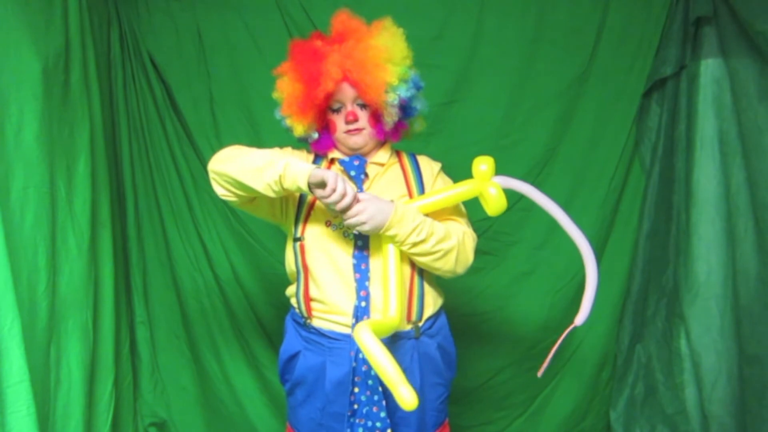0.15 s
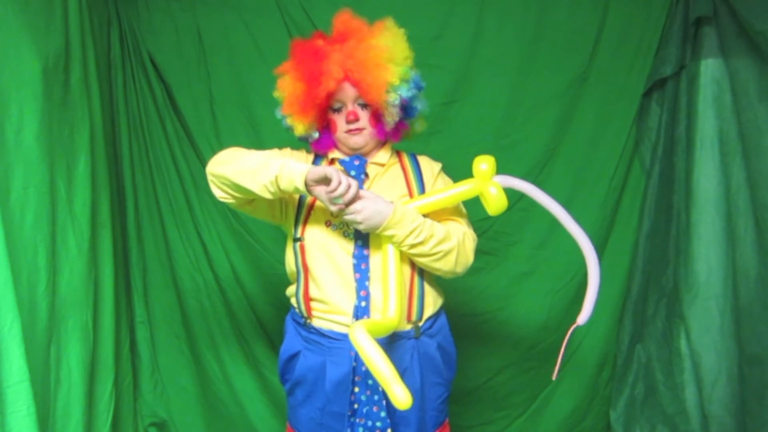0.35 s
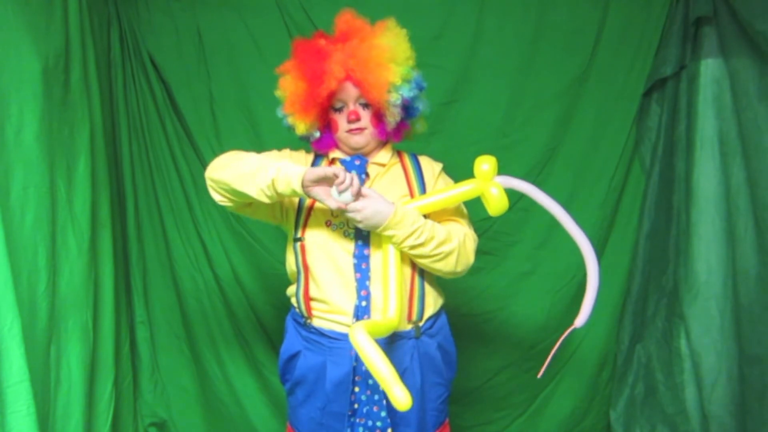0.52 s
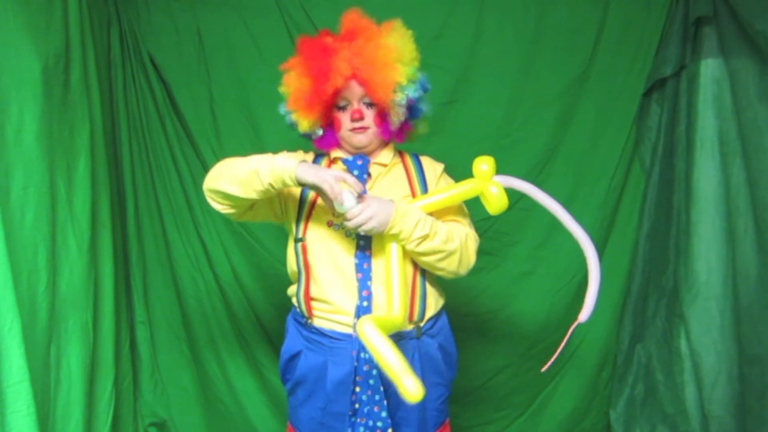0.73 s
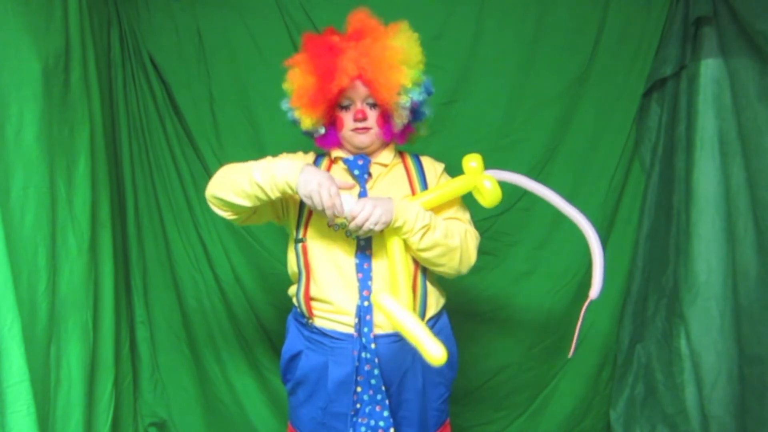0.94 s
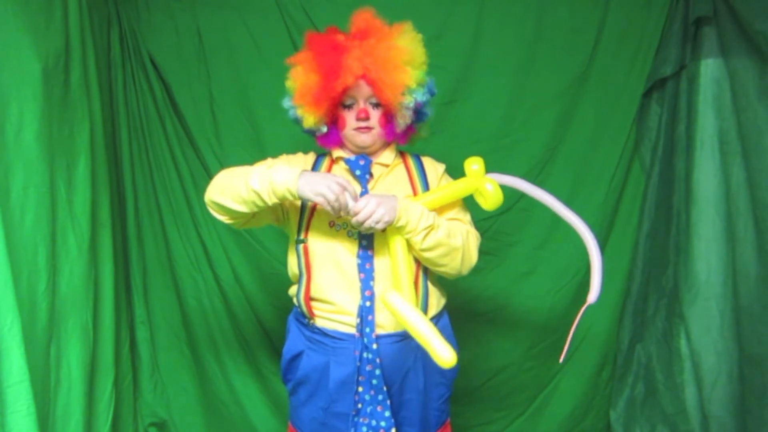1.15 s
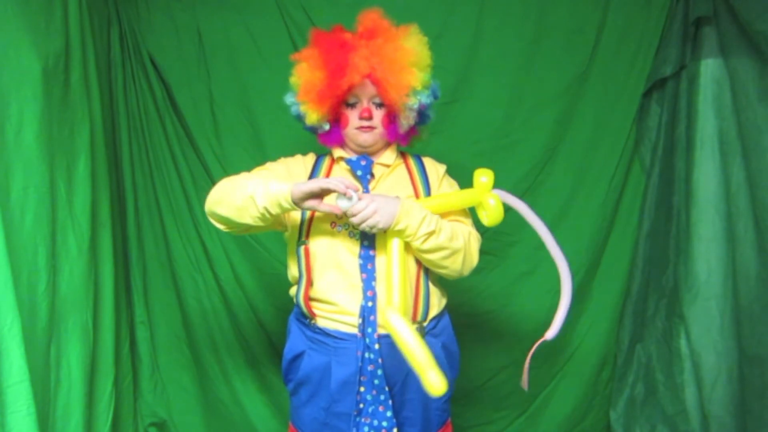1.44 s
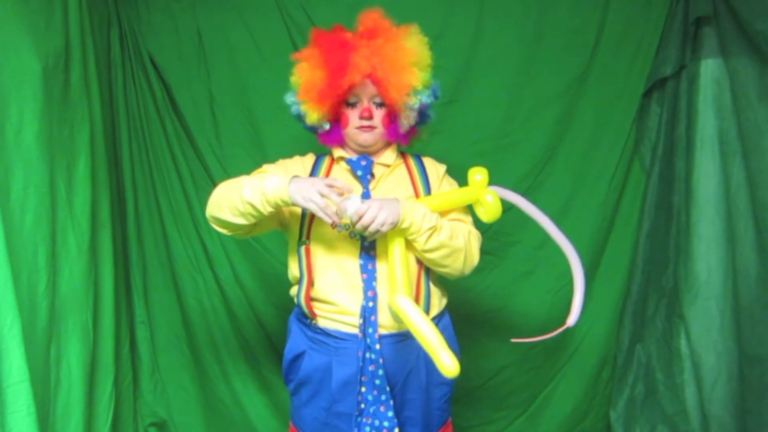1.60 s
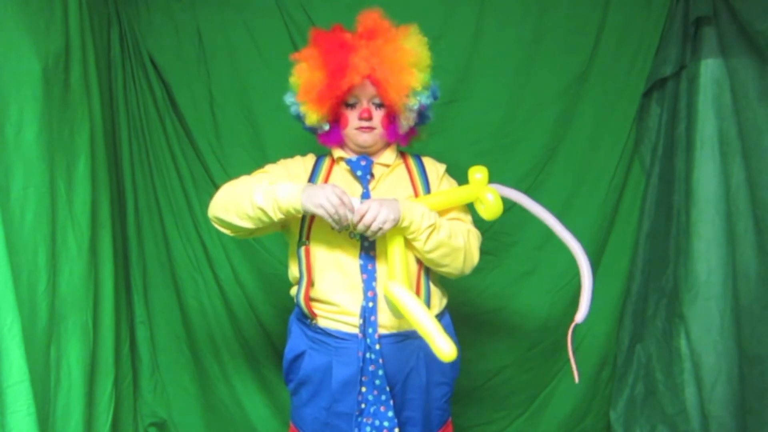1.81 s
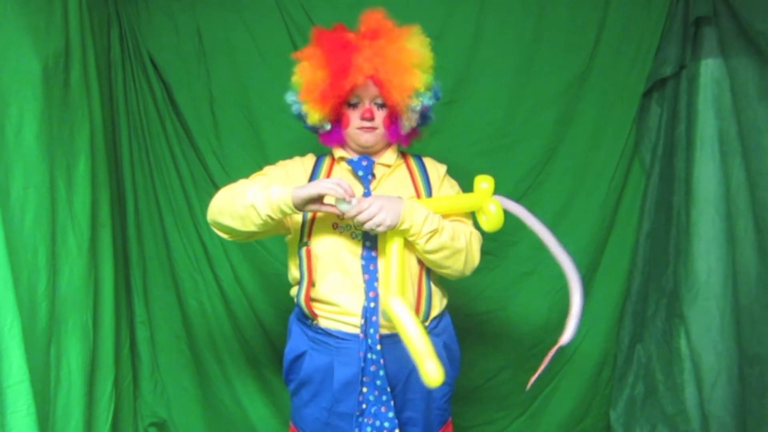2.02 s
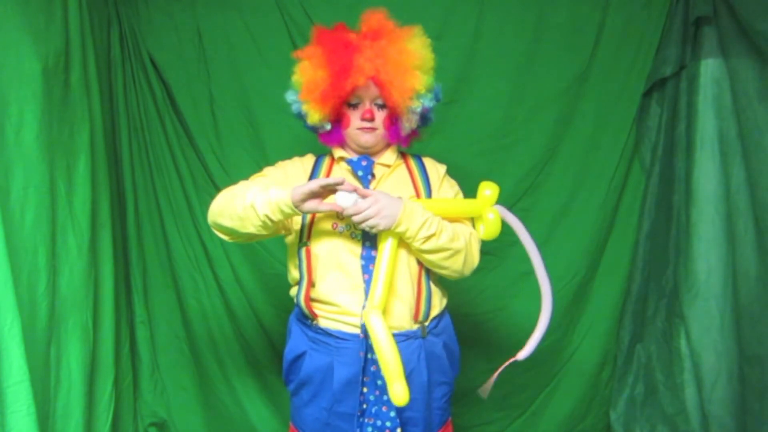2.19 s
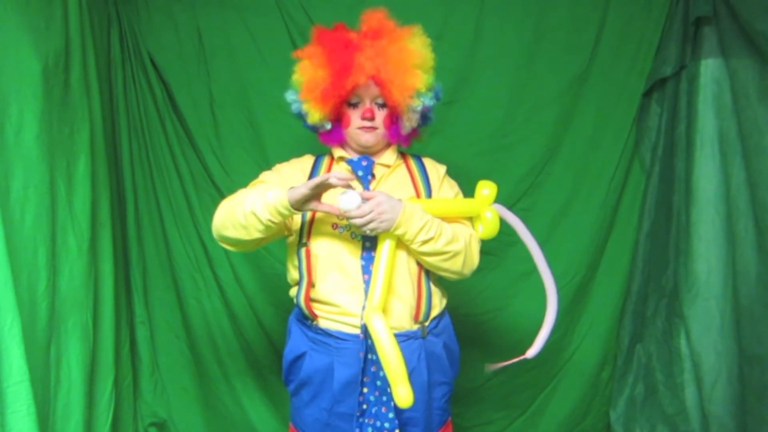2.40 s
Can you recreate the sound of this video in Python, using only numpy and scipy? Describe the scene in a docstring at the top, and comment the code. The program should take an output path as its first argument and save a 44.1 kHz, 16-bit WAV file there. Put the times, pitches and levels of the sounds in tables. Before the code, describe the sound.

Rubbery squeaks and rasps of a balloon being twisted in short bursts, over faint ventilation.

```python
"""Gloved hands squeeze and twist a thin latex balloon in a small room, over a ventilation hum.
First comes a quiet creak with a rough squeak: the rubber sticks and slips, ringing the tight skin,
the air inside and a low note of the room. Near 0.5 s it gets louder: sudden releases rasp, single hard
slips snap, and fast regular slips squeak. After a lull, the sharpest snaps come near 1.4 s. Around 2 s
a last burst of rasps leads to two low squeaks, and a faint creak dies away."""
import sys
import numpy as np
from scipy import signal
from scipy.fft import rfft, irfft
from scipy.io import wavfile
from scipy.ndimage import uniform_filter1d, map_coordinates

SR = 44100
rng = np.random.default_rng(int(sys.argv[2]) if len(sys.argv) > 2 else 0)


def transcribe(u):
    """Save the signal u as a 16-bit wav file named by the first command-line argument.

    u: samples, shape (n,) or (channels, n), limited to [-1, 1]; the rate is SR.
    q: integer samples, one column per channel.
    """
    v = np.clip(np.atleast_2d(u).T, -1, 1)
    q = np.round(v * 32767).astype(np.int16)
    wavfile.write(sys.argv[1], SR, q)


N = 112454


def amp(db):
    """Turns decibels into a number to multiply by."""
    return 10 ** (np.asarray(db) / 20)


def unit(x):
    """Scales a sound to an average (rms) level of 1."""
    return x / np.sqrt(np.mean(x ** 2) + 1e-20)


def look_up(points, hz):
    """Finds the value at a frequency between the rows of a table."""
    row_hz, value = np.transpose(points)
    return np.interp(np.log(hz + 1), np.log(row_hz), value)


def add(mix, start_s, sound):
    """Mixes a sound in at its start time."""
    part = mix[max(round(start_s * SR), 0):][:len(sound)]
    part += sound[:len(part)]


def colour(x, points, size=2048):
    """Makes some frequencies louder and others softer, with no ringing ahead of a click."""
    log_gain = np.log(amp(look_up(points, abs(np.fft.fftfreq(size, 1 / SR)))))
    taps = np.fft.ifft(np.exp(np.conj(signal.hilbert(log_gain)))).real
    return signal.fftconvolve(x, taps)[:len(x)]


def resonate(x, hz, width_hz):
    """Rings at a pitch that may move; a smaller width rings longer."""
    turn = np.exp(2j * np.pi * np.cumsum(hz * np.ones(len(x))) / SR)
    decay = np.exp(-np.pi * width_hz / SR)
    return 2 * (turn * signal.lfilter([1 - decay], [1, -decay], x / turn + 1e-18)).real


def drift(n, per_s):
    """Wanders around zero, reaching a new random value per_s times a second."""
    return np.interp(np.arange(n) * per_s / SR, np.arange(4096), rng.standard_normal(4096))


# The tone of the moving air. Each row: frequency in Hz, relative level in dB.
AIR_TONE = [(15, -74.5), (25, -24.5), (84, -18.5), (117, -10), (285, -12), (317, -12.5), (344, -14),
            (373, -4), (476, -8), (516, -11.5), (796, -9.5), (863, -22), (988, -12.5), (1700, -16.5),
            (3250, -31.5), (16000, -59)]
# How much the air noise differs between left and right. Each row: frequency in Hz, gain in dB.
AIR_WIDTH = [(30, -3), (120, -3), (350, -7), (1500, -11), (5000, -1), (12000, -3)]
# The notes of the hum. Each row: pitch in Hz, level in dB.
HUM_NOTES = [(317.6, -56.5), (473.7, -48), (1157, -57)]


def ventilation():
    """Air rushes steadily under a few wavering hum notes."""
    mid, side = (amp(-43.5) * unit(colour(rng.standard_normal(N + SR), AIR_TONE)[SR:]) for _ in range(2))
    for hz, db in HUM_NOTES:
        phase = 2 * np.pi * np.cumsum(hz + 3.56 * drift(N, 13.99)) / SR
        waver = 1 + .061 * drift(N, 25)
        mid = mid + amp(db) * np.sqrt(2) * np.sin(phase) * waver
    side = colour(side, AIR_WIDTH)
    return np.array([mid + side, mid - side])


# How long the room rings. Each row: frequency in Hz, seconds to fade by 60 dB.
ROOM_FADE = [(200, 0.13), (450, 0.19), (1200, 0.16), (3000, 0.18), (6000, 0.22), (12000, 0.061)]


def room_tail(rise_s=.0068):
    """Countless echoes blur into noise, each frequency dying at its own speed."""
    noise = rng.standard_normal(SR // 2)
    t = np.arange(len(noise)) / SR
    rise = np.minimum(t / rise_s, 1)
    shape = rise * np.exp(-t / .03) + .01
    for _ in range(3):  # even out the tone, then the loudness
        spectrum = rfft(noise * shape)
        noise = irfft(spectrum / (abs(spectrum) + 1e-9), len(noise)) / shape
        noise /= np.sqrt(uniform_filter1d(noise ** 2, size=400))
    hz, age_s, bands = signal.stft(noise, SR, nperseg=256)
    fade = 10 ** (-3 * age_s / look_up(ROOM_FADE, hz)[:, None])
    tail = signal.istft(bands * fade, SR, nperseg=256)[1][:len(t)] * rise ** 2
    return tail / np.linalg.norm(tail)


# Echoes from nearby surfaces. Each row: delay in seconds, strength as a share of the direct sound.
NEAR_ECHOES = [(.0032, 0.87), (.0047, 0.38), (.0069, 0.21), (0.0111, 0.18), (0.0136, 0.25)]
# How much the room's tail differs between left and right. Each row: frequency in Hz, gain in dB.
ROOM_WIDTH = [(200, -14.5), (1200, -15), (2500, -15.5), (5000, -9.5), (9000, 0)]
MOVES_PER_S = 7  # how often the hands move and stretch the balloon


def room(x):
    """Near echoes shift as the balloon moves; a short tail follows, wider in the treble."""
    mid, t = x.copy(), np.arange(N) / SR
    for delay_s, gain in NEAR_ECHOES:
        late_s = delay_s + .0003 * drift(N, MOVES_PER_S)
        mid += gain * map_coordinates(x, [(t - late_s) * SR], order=3)
    tail, wide = (amp(-2) * signal.fftconvolve(x, room_tail())[:N] for _ in range(2))
    side = colour(wide, ROOM_WIDTH)
    return np.array([mid + tail + side, mid + tail - side])


# A low ring of the room near 380 Hz, and the balloon's higher notes.
# Each row: pitch in Hz, width in Hz, gain in dB.
RINGING_NOTES = [(378, 26, -2), (972, 25, -3.5), (1105, 17, -0.5), (1547, 37, -1), (2195, 240, -6.5),
                 (2936, 183, -3.5)]


def ringing(rubbing):
    """Rubbing sets off a low ring of the room and the balloon's higher notes; all waver in pitch."""
    bend = 1 + .04 * drift(N, MOVES_PER_S)
    return rubbing + sum(amp(db) * resonate(rubbing, hz * bend, width) for hz, width, db in RINGING_NOTES)


def cut_lows(x, ring_hz):
    """A tight patch of skin gives off little sound below its own pitch."""
    cutoff_hz = np.clip(.41 * ring_hz, 50, 5000)
    return signal.sosfilt(signal.butter(2, cutoff_hz, "high", fs=SR, output="sos"), x)


def slips(per_s, jitter=.3, spread_db=2):
    """Rubber sticks and slips: clicks of uneven spacing and size, the first one at once."""
    gap, size = rng.standard_normal((2, 400))
    due = np.cumsum(np.exp(jitter * gap))
    at = np.searchsorted(np.cumsum(per_s) / SR, due - due[0])
    in_time = at < len(per_s)
    pulses = np.zeros(len(per_s))
    pulses[at[in_time]] = amp(spread_db * np.tanh(size[in_time]))
    return pulses / np.sqrt(per_s)  # faster slipping is no louder


# The tone of a slip's scratch. Each row: frequency in Hz, relative level in dB.
SCRATCH_TONE = [(60, -58), (220, 16), (420, -12.5), (1200, -4.5), (2400, 10), (3500, 5), (5800, -1),
                (8000, -9.5), (10000, -17), (11200, -31.5), (12200, -85), (13500, -27.5), (15800, -31.5)]


def scratch(pulses, grit_s=.0018, grit_db=-9.5):
    """Each slip has a sharp edge, trailed by a little grit."""
    trails = signal.lfilter([1], [1, -np.exp(-1 / (grit_s * SR))], pulses)
    grit = trails * rng.standard_normal(len(pulses))
    return unit(colour(pulses + amp(grit_db) * grit, SCRATCH_TONE))


# The tone of the ringing skin. Each row: frequency in Hz, relative level in dB.
SKIN_TONE = [(60, -62.5), (260, -12.5), (420, 1), (650, 8.5), (1100, 1.5), (1800, 2), (2400, 3.5),
             (3300, -6), (5000, -8.5), (9000, -18.5), (12000, -85)]


def creak(slips_per_s, ring_hz, scratch_db):
    """Slips ring the skin at a pitch set by its tightness: a dull knock and a longer singing note."""
    hz = np.mean(ring_hz)
    knock_width_hz, sing_width_hz = hz / .88, hz / 7.2
    pulses = slips(slips_per_s)
    knock = cut_lows(pulses, hz)
    for _ in range(2):
        knock = resonate(knock, ring_hz, knock_width_hz)
    sing = resonate(knock, ring_hz, sing_width_hz)
    skin = unit(colour(unit(knock) + amp(-21.5) * unit(sing), SKIN_TONE))
    return skin + amp(scratch_db) * cut_lows(scratch(pulses), hz)


# One list of moments for each twist. Each row: time in seconds, level in dB, skin pitch in Hz,
# slips per second, scratch in dB compared with the ring.
TWIST_CURVES = [
    [(0, -41.5, 1970, 298, -1.5), (.04, -40, 1944, 343, -8.5), (.066, -39.5, 2060, 259, -4.5),
     (.11, -36.5, 1806, 286, -5), (.14, -35.5, 1690, 189, -1.5), (.22, -38.5, 1550, 95, -1.5),
     (.285, -36.5, 1592, 208, -8), (.31, -51, 1540, 225, -7), (.365, -39.5, 1330, 210, -18)],
    [(.395, -42, 1197, 150, -10), (.44, -43, 1240, 212, -5.5), (.484, -30.5, 1260, 280, -14.5),
     (.507, -13, 1610, 347, -8), (.522, -32, 1400, 273, -22), (.535, -34, 1600, 260, -3),
     (.566, -30, 1356, 220, -18), (.58, -18.5, 1340, 265, -12), (.6, -27, 1180, 200, -21),
     (.636, -23, 1110, 186, -15.5), (.66, -28.5, 885, 220, -16), (.678, -17, 1070, 330, -18),
     (.708, -30, 1227, 380, -8)],
    [(1.11, -39.5, 1130, 257, -1), (1.14, -26, 1090, 172, -13), (1.162, -32, 1060, 150, -24),
     (1.185, -33, 1310, 194, -8.5), (1.258, -29.5, 1266, 187, -10.5), (1.293, -23, 1086, 181, -15),
     (1.32, -23, 1112, 171, -11.5), (1.369, -28, 1160, 201, -8.5), (1.381, -23.5, 1070, 161, -13),
     (1.424, -29.5, 1130, 129, -11), (1.452, -35.5, 1065, 241, -11.5), (1.485, -28, 990, 194, -15),
     (1.52, -54, 1020, 183, -10), (1.66, -43, 1165, 336, -14.5), (1.76, -57.5, 1190, 190, -7)],
    [(1.81, -37.5, 1050, 280, -17), (1.86, -39.5, 1070, 265, -14), (1.875, -39.5, 1390, 204, -5),
     (1.918, -39, 1350, 362, -11), (1.94, -32, 1480, 255, -15), (1.975, -32, 1350, 247, -9.5),
     (2.026, -31, 1260, 269, -9.5), (2.07, -33.5, 1180, 332, -10.5), (2.115, -34, 1100, 245, -20),
     (2.15, -36.5, 1130, 255, -18), (2.18, -32.5, 1133, 198, -16), (2.22, -52, 1130, 220, 0)],
    [(2.38, -52, 1160, 170, -7.5), (2.455, -45.5, 1030, 161, -13.5), (2.55, -57, 1143, 138, -4)],
]


def twist(points, grip_changes_per_s=70, let_go_s=.0061):
    """A long rub follows the hands' pressure and speed; the changing grip shakes level and pitch."""
    times, *curves = np.transpose(points)
    t = np.arange(times[0], times[-1], 1 / SR)
    db, ring_hz, slips_per_s, scratch_db = (np.interp(t, times, curve) for curve in curves)
    db = db + 2 * drift(len(t), grip_changes_per_s)
    ring_hz = ring_hz * (1 + .1 * drift(len(t), grip_changes_per_s))
    ease_off = np.minimum((times[-1] - t) / let_go_s, 1)
    return amp(db) * ease_off * creak(slips_per_s, ring_hz, scratch_db)


# The tone of the crack that opens a release. Each row: frequency in Hz, relative level in dB.
CRACK_TONE = [(100, -46), (1500, -5), (3200, 10), (5500, 5.5), (9000, -8.5), (11000, -17), (12200, -32.5),
              (14000, -15)]
# Sudden releases. Each row: start in seconds, level in dB, skin pitch in Hz, fade in seconds,
# scratch in dB compared with the ring.
SUDDEN_RELEASES = [(.325, -46, 1600, 0.0034, 4.5), (.368, -38.5, 1471, .003, 4),
                   (0.3897, -28, 1240, 0.0022, -9), (0.488, -23, 1600, 0.006, -8),
                   (0.57, -19, 1420, 0.0043, -6.5), (0.973, -41, 994.2, 0.0062, -7.5),
                   (1.0347, -41.5, 992, 0.011, -6.5), (1.093, -35.5, 1220, 0.0041, -5),
                   (1.111, -19, 1330, 0.0069, -14), (1.419, -18, 1340, 0.0038, -14),
                   (1.557, -28, 790, 0.0055, -23), (1.81, -45.5, 1019, 0.0043, -0.5),
                   (1.871, -24, 1410, 0.0075, -9), (1.927, -24, 1250, 0.0075, -8),
                   (2.033, -16, 1380, 0.0051, -14), (2.088, -17, 1020, 0.0063, -6),
                   (2.11, -22.5, 1000, 0.005, -4.5), (2.14, -25.5, 1220, 0.0051, -2.5),
                   (2.2461, -36, 710, 0.024, -2.5)]


def release(db, ring_hz, fade_s, scratch_db, slips_per_s=470, crack_s=.0025):
    """The rubber lets go with a crack and a short, dying rasp of slips."""
    t = np.arange(0, .06, 1 / SR)
    rasp = np.exp(-t / fade_s) * creak(np.full(len(t), slips_per_s), ring_hz, scratch_db)
    crack = np.exp(-t / crack_s) * unit(colour(rng.standard_normal(len(t)), CRACK_TONE))
    return amp(db) * np.sqrt(2) * (rasp + amp(scratch_db - 3.5) * crack)


# Single hard slips. Each row: start in seconds, level in dB, skin pitch in Hz.
HARD_SLIPS = [(.522, -15, 1280), (0.63, -20, 1300), (.677, -12, 980), (1.16, -20, 1090), (1.292, -13, 1280),
              (1.3808, -8, 1200), (1.408, -8, 1210), (1.4387, -13, 1200), (1.474, -24.5, 1090),
              (2.038, -14, 1610)]


def snap(db, ring_hz, fade_s=.0012):
    """One hard slip plucks the skin, which swings just a few times."""
    t = np.arange(0, .02, 1 / SR)
    ring = np.sqrt(2) * np.sin(2 * np.pi * ring_hz * t) * np.minimum(t * ring_hz * 2, 1)
    edge = amp(-17) * unit(colour(rng.standard_normal(len(t)), SCRATCH_TONE))
    return amp(db) * np.exp(-t / fade_s) * (ring + edge)


# Squeaks. Each row: start and length in seconds, level in dB, glide from and to in Hz (before the
# arch lowers both ends), skin pitch in Hz, roughness from 0 to 1, pure tone in dB next to the ring.
SQUEAK_GLIDES = [(0.121, 0.2, -34.5, 1730, 1545, 1700, 0.83, 8),
                 (0.49, 0.029, -17.5, 1608, 1523, 1597, 0, 1),
                 (0.51, 0.018, -15.5, 1244, 1153, 1200, 0.06, -24),
                 (0.571, 0.013, -17, 1556, 1480, 1500, 0.06, 4),
                 (0.629, 0.035, -33, 680, 578, 670, 0.2, -5),
                 (0.672, 0.041, -15.5, 403.8, 403.6, 1299, .17, -2),
                 (1.108, 0.015, -18.5, 1123, 1088, 1100, 0.03, 9),
                 (1.276, 0.027, -25, 1597, 1516, 1600, 0.13, -18),
                 (1.375, 0.035, -17.5, 1181, 1327, 1240, 0.62, 15),
                 (1.562, 0.03, -15.5, 480, 461, 900, 0.17, 3),
                 (2.246, .036, -26.5, 689.7, 591.5, 1120, 0.64, 0),
                 (2.302, 0.017, -36.5, 647, 574, 500, 0.08, 0)]


def squeak(length_s, db, from_hz, to_hz, ring_hz, rough, pure_db):
    """Fast, regular slips join into one gliding note that swells and stops."""
    progress = np.arange(0, 1, 1 / (length_s * SR))
    glide_hz = from_hz + (to_hz - from_hz) * progress
    arch = 1 + .06 * (np.sin(np.pi * progress) - 1)
    wobble = 1 + .25 * rough * drift(len(progress), 600)
    cycles = np.cumsum(glide_hz * arch * wobble) / SR
    pulses = np.diff(np.floor(cycles), prepend=0)  # one slip per cycle
    pulses *= 1 + rough * drift(len(progress), 515)
    ring = resonate(cut_lows(pulses, from_hz), ring_hz, width_hz=404)
    pure = amp(pure_db) * np.sqrt(2) * np.cos(2 * np.pi * cycles)
    tone = unit(unit(colour(ring, SKIN_TONE)) + pure)
    swell = np.interp(progress, [0, .66, 1], [.1, 1, 0])
    return amp(db) * swell * (tone + amp(-27.5) * scratch(pulses))


def scene():
    """All the rubbing rings and echoes in the room, where the ventilation joins it."""
    rubbing = np.zeros(N)
    for points in TWIST_CURVES:
        add(rubbing, start_s=points[0][0], sound=twist(points))
    for play, table in (release, SUDDEN_RELEASES), (snap, HARD_SLIPS), (squeak, SQUEAK_GLIDES):
        for start_s, *settings in table:
            add(rubbing, start_s, play(*settings))
    in_room = amp(-1.22) * room(ringing(rubbing)) / np.sqrt(2)
    return (in_room + ventilation()) * amp([[-1], [1]])  # a little louder on the right


def record(dry):
    """Cuts away the very highest treble, above 15900 Hz."""
    low_pass = signal.firwin(511, 15900, window=("kaiser", 9), fs=SR)
    return signal.oaconvolve(dry, low_pass[None], "same")


dry = scene()
out = record(dry)
transcribe(out)
```